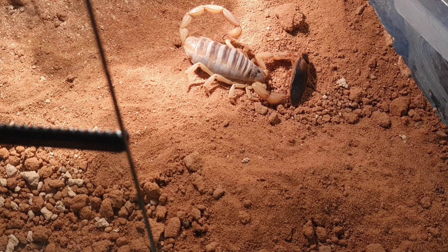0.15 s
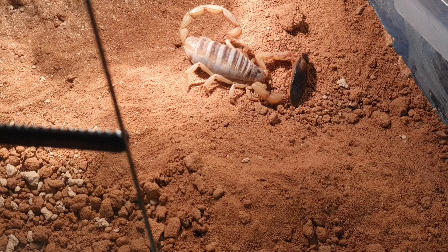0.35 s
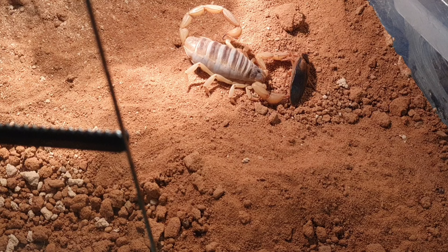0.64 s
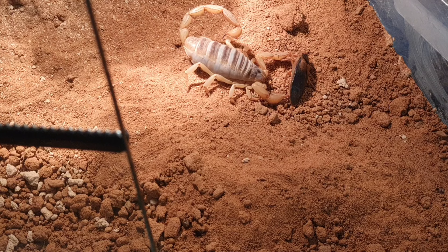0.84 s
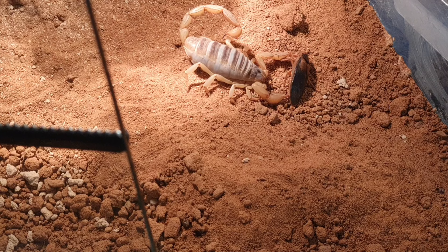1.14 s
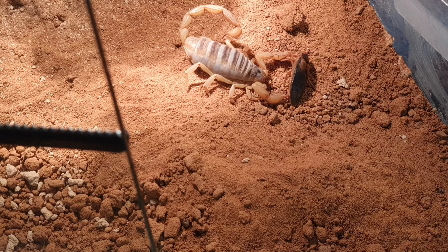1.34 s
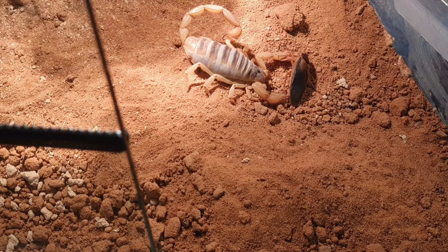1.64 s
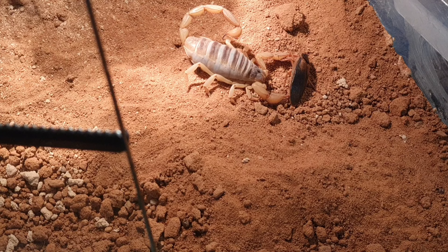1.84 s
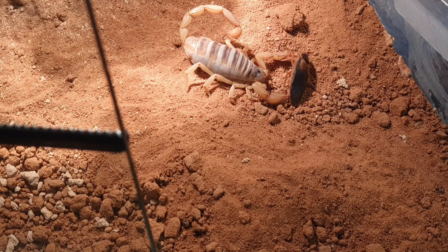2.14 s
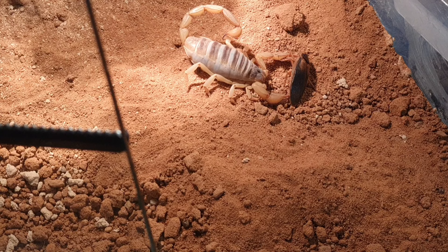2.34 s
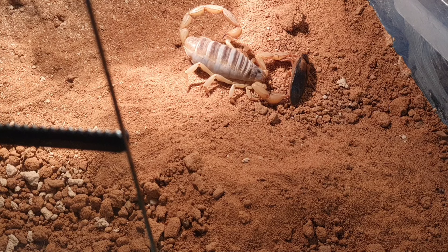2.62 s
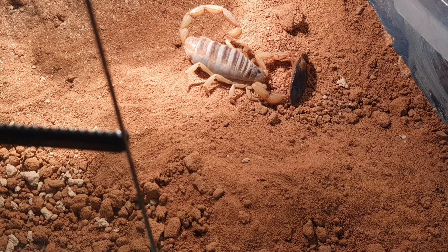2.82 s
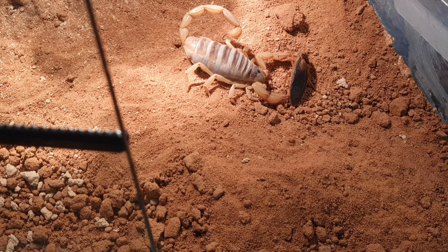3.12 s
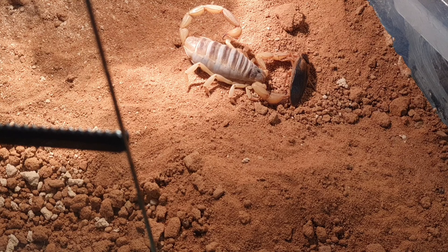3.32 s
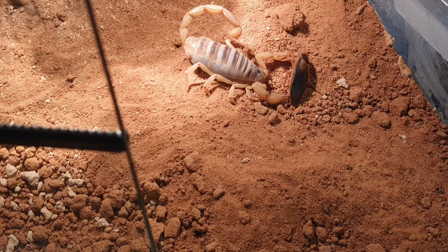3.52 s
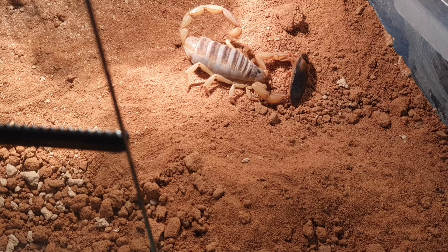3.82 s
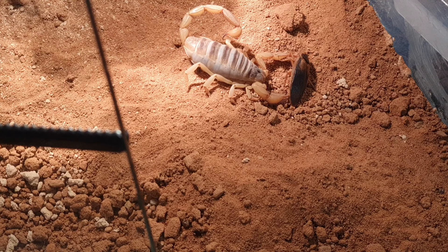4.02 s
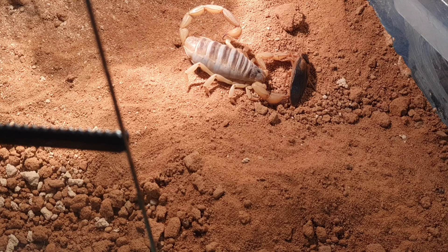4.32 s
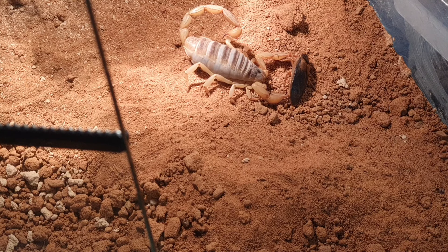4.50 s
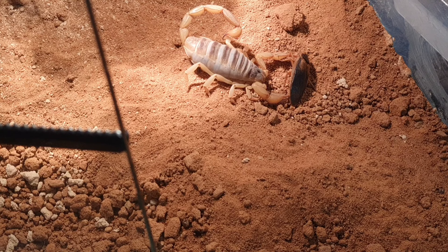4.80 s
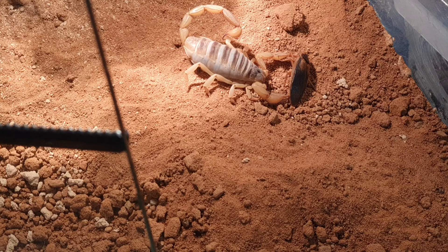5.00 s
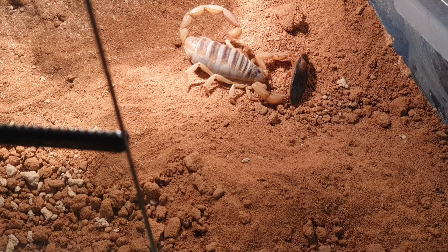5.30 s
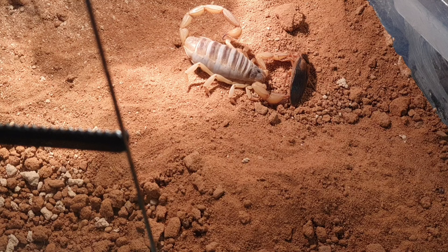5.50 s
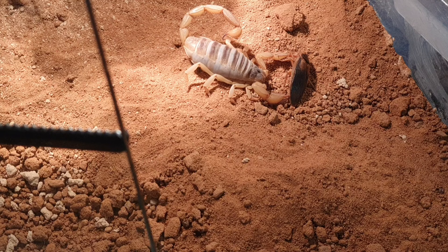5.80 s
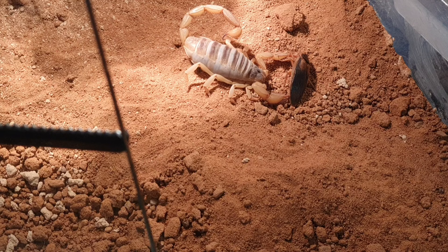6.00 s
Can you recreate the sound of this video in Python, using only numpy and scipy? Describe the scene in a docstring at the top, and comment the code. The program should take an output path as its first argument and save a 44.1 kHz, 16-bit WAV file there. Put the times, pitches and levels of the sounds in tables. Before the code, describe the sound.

After a clattering knock and brief handling, a hand sprayer hisses steadily, its mist spattering against an animal enclosure in a quiet room.

```python
"""In a quiet room, something is set down with a clattering knock on furniture by a small animal enclosure.
A hand rustles on a pressurised sprayer and its trigger clicks. At 0.66 s the valve leaks; at 0.75 s it
opens and the nozzle hisses steadily. More and more mist lands on the enclosure, where drops splash and
drum in uneven surges that ring its walls. All is heard close to a camera's two microphone ports."""
import sys
import numpy as np
from scipy import signal
from scipy.fft import rfft, irfft, next_fast_len
from scipy.io import wavfile
from scipy.ndimage import uniform_filter1d, map_coordinates

SR = 44100
rng = np.random.default_rng(int(sys.argv[2]) if len(sys.argv) > 2 else 0)


def waveform_to_disk(signal):
    """Save audio, clipped to [-1, 1], as 16-bit WAV at the path in sys.argv[1]."""
    frames = np.transpose(np.atleast_2d(signal))
    scaled = np.clip(frames, -1, 1) * 32767
    samples = np.round(scaled).astype(np.int16)
    wavfile.write(sys.argv[1], SR, samples)


N = 271215

# room tone spectrum: freq_hz, level_db
AIR = [(25, -1), (90, 3.5), (300, -21), (600, -16), (2000, -24), (4000, -28), (7000, -28), (15000, -30)]
# contacts with the furniture: start_s, strength_db, contact_s
CONTACTS = [(0.1228, -57, 0.00087), (.125, -47.5, 0.001), (0.131, -31, 0.0023), (.135, -33.5, 0.0018),
            (0.144, -31, 0.002), (0.1467, -31, 0.0027), (0.156, -33, 0.0017), (0.1582, -36, 0.0012),
            (.175, -29, 0.0035), (0.1882, -26, 0.006), (0.2478, -42, .0041), (1.312, -77, 0.00043),
            (1.347, -80, 0.00064)]
# furniture modes: pitch_hz, level_db, t60_s
WOOD_MODES = [(70.2, -20, 0.53), (109.5, -2.5, 0.57), (137.7, 5.5, 0.15), (157, -8.5, 0.41),
              (223, -20, 0.57), (238.5, 0, 0.17), (292, -12.5, 0.22), (320, -14, 0.32), (373.3, -5, 0.29),
              (435, -18, 0.12), (483, 4, 0.14), (570, -3.5, 0.19), (635, -8, .17)]
# contact noise spectrum: freq_hz, level_db
CLACK = [(60, -26), (190, -21), (330, -2), (560, 14.5), (800, -2.5), (1200, 0), (1900, -4.5), (3000, -0.5),
         (5500, -8.5), (8000, -25.5), (15000, -23)]
# room decay: freq_hz, t60_s
ROOM_DECAY = [(70, 1), (250, 0.28), (700, 0.18), (3000, 0.068), (12000, 0.06)]
# decay of the room's far end: freq_hz, t60_s
FAR_DECAY = [(700, 0.35), (4000, 0.43), (12000, .45)]

# hand rustle envelope: time_s, level_db
RUSTLE_LEVELS = [(.12, -82), (.24, -85), (.285, -70), (.35, -74), (.42, -73), (.55, -74), (.7, -73.5),
                 (.85, -88.5)]
# hand rustle spectrum: freq_hz, level_db
RUSTLE = [(300, -7), (900, -7), (2300, -13.5), (3100, -8.5), (4000, -6), (5200, -7), (6600, -22),
          (8200, -21), (15000, -26)]
# trigger and valve clicks: start_s, level_db
CLICKS = [(.278, -65), (.297, -68), (.363, -67), (.378, -65), (.654, -57), (.667, -55), (.695, -65),
          (.727, -51), (.742, -47)]
# click spectrum: freq_hz, level_db
PLASTIC = [(1000, -24), (4000, -11), (6500, -8), (8200, 2), (12000, -11), (15500, -6)]
# soft handling bumps: peak_s, length_s, level_db, centre_hz
BUMPS = [(0.441, 0.018, -60.5, 365), (0.446, .024, -65.5, 510), (0.485, 0.032, -50.5, 151.6),
         (0.503, .07, -73, 72.8), (0.531, 0.089, -62.5, 151), (1.319, 0.012, -58, 714),
         (1.327, .025, -69, 95), (3.045, 0.11, -72.5, 149), (4.396, 0.066, -72, 130),
         (5.536, .06, -70, 217), (5.583, 0.062, -68, 124), (5.93, .05, -65, 68), (6.0, 0.016, -47.5, 850),
         (6.055, .05, -71, 110)]
# bump spectrum: ratio_to_centre, level_db
BUMP_SHAPE = [(.4, -40), (.75, -5), (1, 11), (1.3, -6.5), (2.2, -19), (4, -23.5), (12, -87)]

# spectrum of the barely open valve: freq_hz, level_db
LEAK = [(1500, -21), (4500, -3), (8000, -4), (12000, 4), (15800, -2)]
# atomising spectrum: freq_hz, level_db
FIZZ = [(300, -26), (600, -16.5), (2000, -10), (4500, -4.5), (5600, -2), (7000, -13.5), (8500, -15),
        (10000, -4.5), (11700, 0.5), (14000, -0.5), (15800, -0.5)]
# fizz envelope, rising as the spray turns fine, sinking with pressure: time_s, level_db
FIZZ_LEVELS = [(.75, -52), (1.0, -49), (1.3, -44), (1.8, -40.5), (2.3, -40.5), (3.2, -41), (4.2, -42.5),
               (6.15, -43)]
# jet spectrum: freq_hz, level_db
JET = [(250, -24), (450, -18.5), (1000, -6), (1950, -5), (2400, -3.5), (2950, 2.5), (3500, -2),
       (4900, -0.5), (7000, -10), (8200, -14), (15000, -14.5)]
# spray landing on the enclosure: time_s, share_db
AIM = [(.77, -14.5), (1.2, -10), (1.75, -4), (2.3, -5.5), (3.3, -1.5), (4.5, 0), (5.6, 0), (6.15, -1)]
# enclosure resonances: centre_hz, width_hz, lift_db
ENCLOSURE_MODES = [(602, 45, 6), (760, 24, 6), (890, 46, 5.5), (1502, 52, 10), (1598, 20, 11),
                   (1818, 26, 7), (2785, 70, 6), (2970, 64, 8.5), (3423, 49, 8), (3680, 100, 8),
                   (4110, 190, 8), (4462, 154, 13.5), (4817, 113, 12.5), (6240, 120, 6), (6620, 150, 1.5),
                   (7720, 200, 3), (7980, 220, 4.5), (8700, 110, 5)]
# fine impact spectrum: freq_hz, level_db
MIST = [(50, -13.5), (200, -19), (340, -23.5), (600, -9.5), (1100, -3), (2300, -3.5), (4300, -3),
        (5500, 0.5), (7000, 2), (8300, -0.5), (10000, 0), (15800, -45)]
# coarse impact spectrum: freq_hz, level_db
SPLASH = [(1200, -39), (2600, -3.5), (3400, -2.5), (4120, 3), (4650, -1.5), (5400, -5.5), (6400, -1.5),
          (8000, -14.5), (10000, -11), (15800, -6.5)]
# heavy impact spectrum: freq_hz, level_db
DRUM = [(150, -23), (400, -17.5), (700, -6), (900, -3.5), (1200, -0.5), (1520, 4), (1900, -0.5),
        (2400, -0.5), (3200, -28), (7000, -53)]
# heaviest gushes: peak_s, length_s, splash_db, drum_db
GUSHES = [(1.757, 0.059, -45.5, -55), (2.26, 0.032, -44, -56), (2.528, 0.031, -42, -54),
          (2.634, 0.035, -49, -63), (2.822, 0.018, -46, -68), (2.975, 0.019, -44.5, -60),
          (3.067, 0.034, -46, -53), (3.16, 0.015, -44, -48), (3.513, 0.021, -45, -43),
          (3.637, 0.018, -45, -47), (3.672, 0.013, -49, -57), (3.742, 0.038, -41.5, -48),
          (3.951, 0.015, -36.5, -43), (4.005, 0.049, -43, -49), (4.081, 0.023, -38, -43),
          (4.138, 0.017, -39, -43), (4.264, 0.038, -48.5, -59), (4.382, 0.017, -38, -45),
          (4.437, 0.014, -43, -48), (4.485, 0.0067, -48, -40.5), (4.51, 0.018, -36, -46.5),
          (4.574, 0.021, -41.5, -52), (4.638, 0.027, -41.5, -47.5), (4.696, 0.016, -39, -41),
          (4.766, 0.056, -39, -47), (4.973, 0.026, -37.5, -47.5), (5.075, 0.016, -40, -53),
          (5.137, 0.016, -34, -47), (5.235, 0.01, -36.5, -45), (5.255, 0.015, -38, -45.5),
          (5.302, 0.023, -40.5, -45.5), (5.353, 0.042, -38, -45.5), (5.424, 0.017, -36, -40.5),
          (5.444, 0.014, -38, -44), (5.493, 0.024, -33.5, -43.5), (5.552, 0.02, -35, -37.5),
          (5.616, 0.02, -33.5, -42), (5.664, 0.017, -35.5, -37.5), (5.713, 0.036, -36, -41),
          (5.779, 0.038, -35, -43.5), (5.857, 0.015, -35.5, -43.5), (5.878, 0.012, -38, -43.5),
          (5.949, 0.035, -39, -42), (6.027, 0.026, -39, -38.5), (6.062, 0.019, -34.5, -38.5),
          (6.143, 0.016, -36, -42)]
# single large drops: start_s, level_db
DROPS = [(4.877, -33), (6.013, -45)]
# large drop spectrum: freq_hz, level_db
DROP_TICK = [(500, -12), (1500, -12), (4500, -6), (8500, 5), (15000, -4)]

# spray power common to both ports: freq_hz, share
COHERENCE = [(200, 0.67), (850, 0.64), (1200, 0.91), (1580, 0.37), (1800, 0.93), (2030, 0.94), (2350, 0.51),
             (3100, 0.36), (4000, 0.51), (4500, 0.65), (5400, 0.63), (6900, 0.49), (7500, 0.98),
             (8150, 0.46), (9300, 0.56), (11000, 0.22), (14000, 0.3)]
# port colour: freq_hz, left_db, right_db
PORT_GAINS = [(575, 2, 2.5), (796, -3.5, -2.5), (1220, 3, 1), (1530, 2, -6), (1780, 4, 3), (2100, 7.5, 6),
              (2300, 2, 1.5), (3740, 2, 1), (4010, 1, -3.5), (4450, -1, -1), (5120, 3, 0),
              (6160, -1.5, -0.5), (7110, 0, 0), (8030, 7.5, -5.5), (9250, 6.5, -3), (9770, 1.5, -2),
              (11300, 4.5, -5), (15200, -0.5, -10.5)]
# phase shift from the camera's body: freq_hz, left_lead_rad
PORT_PHASE = [(700, -0.4), (1300, 0.87), (1600, -0.53), (1900, -0.4), (2100, -0.35), (2400, 0.39),
              (2700, 1.45), (3100, 1.04), (3900, 0.022), (4100, -0.78), (4700, -0.084), (5050, 0.075),
              (5650, -1.0), (6450, 0.99), (6950, -1.5), (7550, 0.12), (9200, -1.45), (10300, 0.13),
              (13000, -1.1)]

OPEN_S, OPENING_S = 0.748, 0.015  # valve half open; time scale of opening
FLOW_S = OPEN_S + 0.016  # jet and mist follow the first fizz
TIME_S = np.arange(N) / SR


def amp(db):
    return 10 ** (np.asarray(db) / 20)


def unit_rms(x):
    return x / np.sqrt(np.mean(x ** 2) + 1e-20)


def along(points, hz):
    """Interpolate (freq_hz, value) points on a log axis."""
    freqs_hz, values = np.transpose(points)
    return np.interp(np.log(hz + 1), np.log(freqs_hz + 1), values)


def curve(points, at_s=TIME_S):
    """Interpolate (time_s, value) points."""
    return np.interp(at_s, *np.transpose(points))


def wobble(rate_hz):
    """Smooth random curve with knots at rate_hz."""
    knots = rng.standard_normal(int(N * rate_hz / SR) + 4)
    return map_coordinates(knots, [TIME_S * rate_hz])


def filtered(x, response):
    """Apply a complex frequency response."""
    size = next_fast_len(N + SR // 2)
    return irfft(rfft(x, size) * response(np.fft.rfftfreq(size, 1 / SR)), size)[..., :N]


def noise(spectrum):
    """Coloured noise, rms 1."""
    return unit_rms(filtered(rng.standard_normal(N), lambda hz: amp(along(spectrum, hz))))


def bursts(hits, t60_s):
    """Envelope of sudden, decaying (start_s, level_db) hits."""
    return sum(amp(db - 60 * np.clip(TIME_S - s, 0, 1) / t60_s) * (TIME_S >= s) for s, db in hits)


def swells(rows):
    """Envelope of Gaussian swells; length_s is the half-power width."""
    power = np.zeros(N)
    for peak_s, length_s, db in rows:
        near = np.abs(TIME_S - peak_s) < 2 * length_s
        power[near] += amp(db) ** 2 * np.exp(-np.log(16) * ((TIME_S[near] - peak_s) / length_s) ** 2)
    return np.sqrt(power)


def echoes(x, decay):
    """Diffuse reflections per port, each frequency dying at its own rate."""
    hz, t, bins = signal.stft(rng.standard_normal((2, SR * 3 // 4)), SR, nperseg=128)
    t60_s = along(decay, hz)[:, None]
    tail = signal.istft(bins * amp(-60 * t / t60_s) / np.sqrt(t60_s), SR, nperseg=128)[1]
    tail /= np.linalg.norm(tail, axis=1, keepdims=True)
    return signal.fftconvolve(x[None], tail, axes=1)[:, :N]


def from_left(x, lag_s=0.000295):
    """Direct sound reaches the right port late."""
    return filtered(x, lambda hz: np.exp(-2j * np.pi * hz * np.array([[0], [lag_s]])))


def wide(source):
    """Wide source: one draw shared by the ports, plus one each."""
    share = lambda hz: np.clip(along(COHERENCE, hz), 0, 1)
    common = source()
    close_walls = echoes(common, [(500, 0.095), (4000, 0.095), (14000, 0.054)])
    shared = filtered(from_left(common) + amp(-10) * close_walls, lambda hz: np.sqrt(share(hz)))
    return shared + filtered(np.array([source(), source()]), lambda hz: np.sqrt(1 - share(hz)))


def room_tone():
    """Quiet room, partly alike at both ports."""
    return amp(-82.5) * noise(AIR) + amp(-81.5) * np.array([noise(AIR), noise(AIR)])


def thud():
    """Contacts push the furniture's modes; long ones reach only the low modes."""
    t = np.arange(SR) / SR
    ring = sum(amp(db - 60 * t / t60_s) * np.cos(2 * np.pi * hz * t) for hz, db, t60_s in WOOD_MODES)
    force = np.zeros(N)
    for start_s, db, contact_s in CONTACTS:
        push = t * np.exp(-4 * t / contact_s)
        force += np.interp(TIME_S - start_s, t, amp(db) * push / push.sum())
    radiation = signal.butter(2, 55, "highpass", fs=SR, output="sos")  # panels radiate little deep bass
    wood = signal.sosfilt(radiation, signal.fftconvolve(force, ring)[:N])
    return wood * amp([[-0.5], [0.5]]) + amp(-8) * echoes(wood, ROOM_DECAY)


def clack(hard_s=0.0014, loss_db_per_doubling=14):
    """The same contacts clack: the shorter, the louder."""
    hits = [(start_s, db + 3.5 - loss_db_per_doubling * np.log2(contact_s / hard_s))
            for start_s, db, contact_s in CONTACTS]
    clacks = noise(CLACK) * bursts(hits, t60_s=0.019)
    room = amp(2) * echoes(clacks, ROOM_DECAY) + amp(-12) * echoes(clacks, FAR_DECAY)
    return from_left(clacks) + room


def handling():
    """The hand shifts on the sprayer, presses its trigger and bumps softly against things."""
    rustle = noise(RUSTLE) * amp(curve(RUSTLE_LEVELS))
    clicks = noise(PLASTIC) * bursts(CLICKS, t60_s=0.014)
    dull = lambda centre_hz: noise([(centre_hz * ratio, db) for ratio, db in BUMP_SHAPE])
    bumps = sum(dull(hz) * swells([(s, length_s, db)]) for s, length_s, db, hz in BUMPS)
    direct = from_left(amp(-7.5) * rustle + amp(-5) * clicks + bumps)
    return direct + amp(-5) * echoes(rustle, ROOM_DECAY) + amp(-9) * echoes(clicks + bumps, ROOM_DECAY)


def valve(half_open_s):
    """Smooth opening, 0 to 1."""
    return (1 + np.tanh((TIME_S - half_open_s) / (2 * OPENING_S))) / 2


def nozzle(flutter, leak_s=0.656, leak_rise_s=0.055, sag_db_per_s=0.82):
    """The valve leaks, then opens; the jet fizzes as it breaks up and its hiss sinks with pressure."""
    leak = amp(-65) * np.clip((TIME_S - leak_s) / leak_rise_s, 0, 1)
    fizz_flicker_db = flutter + 1.23 * wobble(600) + 0.6 * wobble(21.7)
    fizz = valve(OPEN_S) * amp(curve(FIZZ_LEVELS) + fizz_flicker_db)
    sag_db = sag_db_per_s * np.maximum(TIME_S - OPEN_S, 0)
    jet = valve(FLOW_S) * amp(-47 - sag_db + 0.5 * flutter + 1.4 * wobble(20))
    return wide(lambda: leak * noise(LEAK) + fizz * noise(FIZZ) + jet * noise(JET))


def droplets(spectrum, rate_hz, scatter_db=2):
    """Dense impacts of unequal size ring the enclosure; rms 1."""
    impacts = (rng.random(N) < rate_hz / SR) * rng.standard_normal(N)
    impacts *= amp(scatter_db * rng.standard_normal(N))
    lift_db = lambda hz: sum(db / (1 + (2 * (hz - centre_hz) / width_hz) ** 2)
                             for centre_hz, width_hz, db in ENCLOSURE_MODES)
    return unit_rms(filtered(impacts, lambda hz: amp(along(spectrum, hz) + lift_db(hz))))


def surges(count=220, rate_hz=36, jitter=0.39, length_s=0.015):
    """Uneven beat of spatter, heavier as more spray lands; columns as GUSHES."""
    late, scatter_db, drum_scatter_db = rng.standard_normal((count, 3)).T
    peaks_s = OPEN_S + (np.arange(count) + 2 + jitter * late) / rate_hz
    size_db = 1.93 * curve(AIM, peaks_s) + scatter_db
    return list(zip(peaks_s, np.full(count, length_s), size_db - 47.5, size_db - 54.5 + drum_scatter_db))


def sweeping(x, depth_db=1.88):
    """The landing spot wanders, so each spectral region swells and fades by itself."""
    bins = signal.stft(x, nperseg=512)[2]
    field = uniform_filter1d(rng.standard_normal(bins.shape[1:]), size=6, axis=0)
    field = uniform_filter1d(field, size=9, axis=1)
    return signal.istft(bins * amp(depth_db * unit_rms(field)), nperseg=512)[1][:, :N]


def spatter(flutter, gush_trim_db=-2.5):
    """Mist rushes on the enclosure; heavier drops splash and drum in clumps within each surge."""
    mist = valve(FLOW_S) * amp(-43 + curve(AIM) + 1.04 * flutter + 0.99 * wobble(35))
    clumps = amp(wobble(150))
    rows = [(s, length_s, splash_db + gush_trim_db, drum_db + gush_trim_db)
            for s, length_s, splash_db, drum_db in GUSHES] + surges()
    splash = clumps * amp(1 + 1.14 * wobble(70)) * swells([(s, span_s, db) for s, span_s, db, _ in rows])
    drum = clumps * amp(1.4 * wobble(70)) * swells([(s, span_s, db) for s, span_s, _, db in rows])

    def patch():
        fine = mist * droplets(MIST, rate_hz=14000)
        coarse = splash * droplets(SPLASH, rate_hz=7000)
        heavy = drum * droplets(DRUM, rate_hz=2000)
        return fine + coarse + heavy

    return sweeping(wide(patch))


def large_drops():
    """Single drops tick on the wall."""
    return from_left(noise(DROP_TICK) * bursts(DROPS, t60_s=0.015))


def spray(pane_echo=-0.092, round_trip_s=0.00306):
    """Nozzle and drops, made hollow by an inverted echo between the enclosure's panes."""
    flutter = wobble(130)  # the liquid sheet tears unevenly
    sound = amp(-1.3) * (nozzle(flutter) + spatter(flutter)) + large_drops()
    return filtered(sound, lambda hz: 1 + pane_echo * np.exp(-2j * np.pi * hz * round_trip_s))


def scene():
    return room_tone() + thud() + clack() + handling() + spray()


def record(dry):
    """Each port has its own colour and phase; both are band-limited."""
    top_hz = 15850
    colour = lambda hz: amp([along([(f, left_db) for f, left_db, _ in PORT_GAINS], hz),
                             along([(f, right_db) for f, _, right_db in PORT_GAINS], hz)])
    phase = lambda hz: np.exp(0.5j * along(PORT_PHASE, hz) * np.array([[1], [-1]]))
    return filtered(dry, lambda hz: colour(hz) * phase(hz) * (hz < top_hz))


dry = scene()
out = record(dry)
waveform_to_disk(out)
```